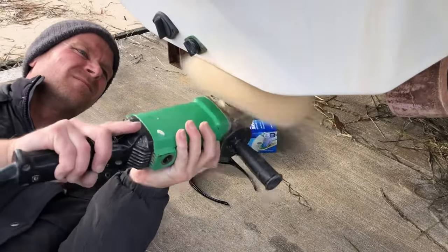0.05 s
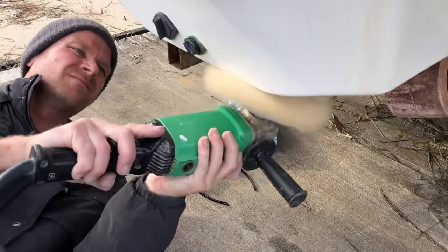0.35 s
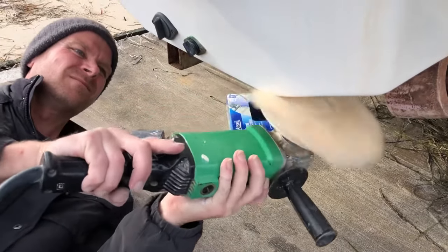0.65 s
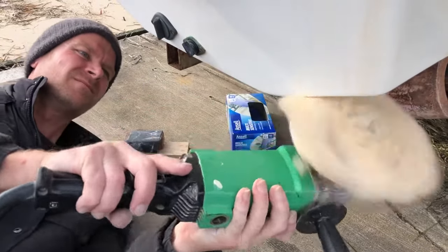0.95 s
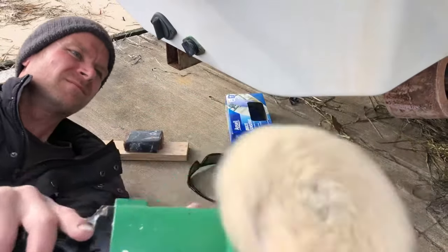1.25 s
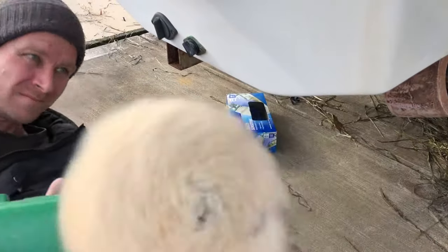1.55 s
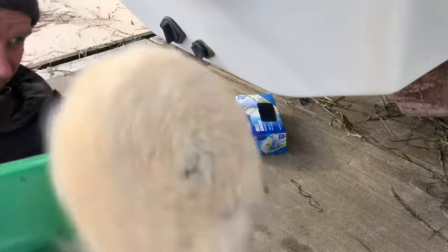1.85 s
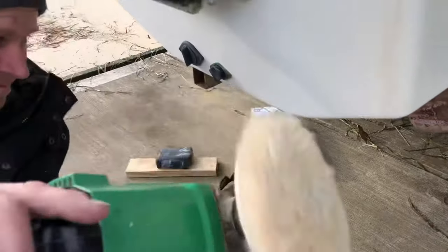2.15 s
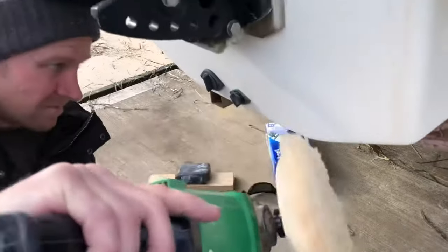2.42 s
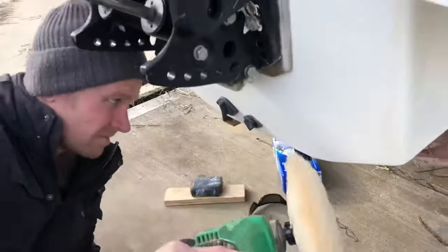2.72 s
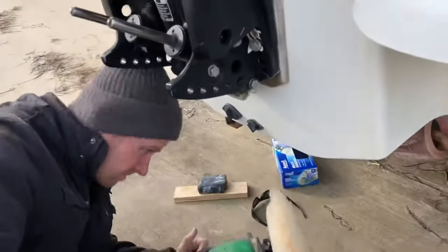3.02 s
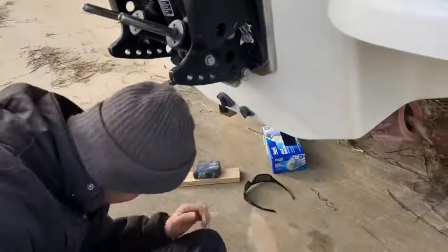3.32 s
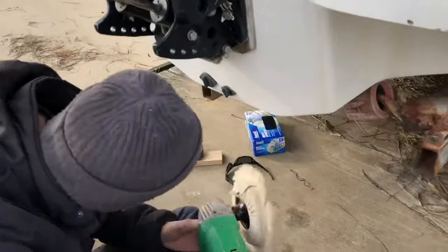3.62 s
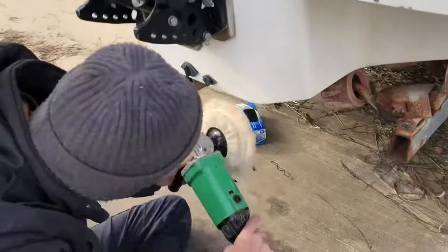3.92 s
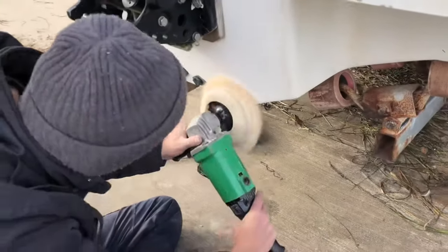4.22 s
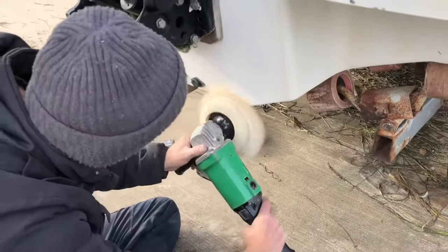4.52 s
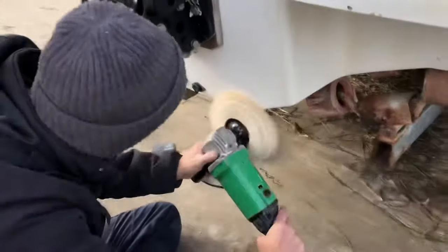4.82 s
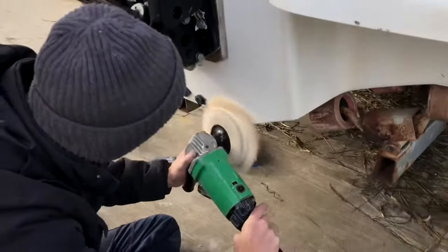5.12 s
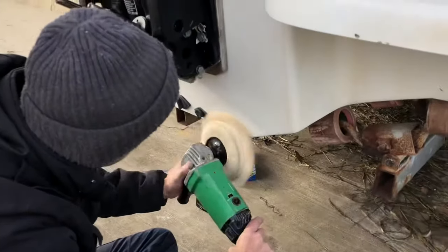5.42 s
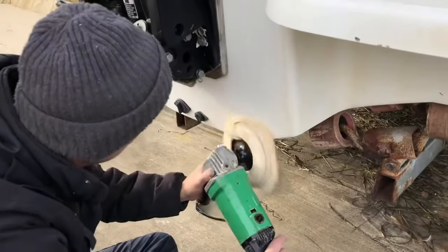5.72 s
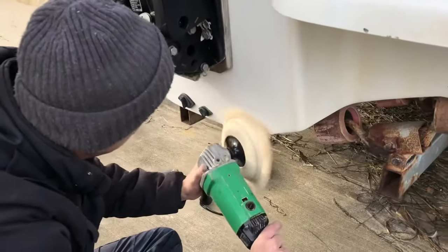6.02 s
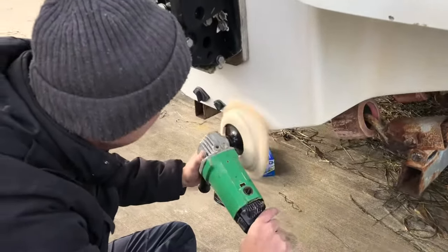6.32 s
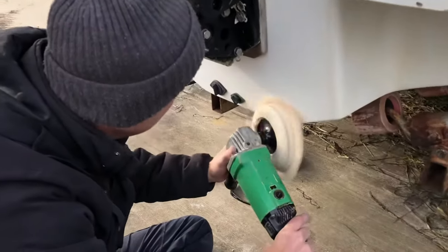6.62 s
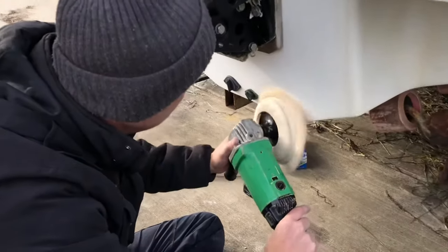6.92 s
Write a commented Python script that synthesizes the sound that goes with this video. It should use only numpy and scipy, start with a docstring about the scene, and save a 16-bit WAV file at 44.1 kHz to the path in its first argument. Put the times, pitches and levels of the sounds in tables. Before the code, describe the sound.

An electric polisher whines with a throb, coasts almost to a stop, then restarts and buffs a boat hull in short bursts.

```python
"""In an open boatyard, a rotary polisher with a wool pad is blipped, coasts almost to rest, restarts
with a mains buzz and buffs a hull in short bursts. One shaft speed sets the pitch of the fan, gear
and commutator whines and the throb of the pad. As it coasts, slack gears knock and carbon brushes
hiss. Gusts buffet the close microphone and a sleeve rustles."""
import sys
import numpy as np
from scipy import signal
from scipy.fft import rfft, irfft, next_fast_len
from scipy.io import wavfile
from scipy.ndimage import uniform_filter1d, map_coordinates

SR = 44100
rng = np.random.default_rng(int(sys.argv[2]) if len(sys.argv) > 2 else 0)


def wav_out(sig):
    """Save sig, one row per channel (or a flat mono array), as 16-bit PCM at SR to the path in sys.argv[1]."""
    wavfile.write(sys.argv[1], SR, np.round(np.clip(np.atleast_2d(sig).T, -1, 1) * 32767).astype(np.int16))


N = 306495
TIME = np.arange(N) / SR
STEP = 16  # samples per control step
MAINS_HZ, TOP_HZ = 50, 15800
REF_SPEED = 100  # reference for the level laws; all speeds are shaft turns per second
PAD_GEARING = 6.62  # shaft turns per pad turn
LIFT_S = 1.0  # the pad leaves the hull until the next squeeze

# trigger squeezes: press_s, release_s, top_turns_per_s, pad_drag_per_s, growl_db,
# lowest_blade_tone_db, blade_overtones_db
SQUEEZES = [(0, .245, 223, .843, -63, -1, -1), (3.872, 3.96, 102.5, .1, -49, -19, -13),
            (4.33, 4.5, 160, .25, -38.5, 0, -10), (4.89, 5.07, 184.7, .525, -39.5, -5, 1.5),
            (5.829, 5.971, 164, .68, -42.5, -7, -1), (6.42, 6.532, 162, .6, -40.5, -8.5, 0)]
# the pad catches on the hull: start_s, end_s, growl_db, lowest_blade_change_db, second_blade_change_db
CATCHES = [(4.14, 4.224, -45, 24.5, 6), (4.768, 4.891, -44, -9, 18)]
# modes of the metal gear head: pitch_hz, width_hz, gain_db
GEAR_HEAD_MODES = [(3650, 69, 7), (4370, 190, 4), (4905, 230, 3.5), (6170, 140, -5), (7640, 68, 10),
                   (1650, 87, 2)]


def amp(db):
    """Decibels to amplitude ratio."""
    return 10 ** (np.asarray(db) / 20)


def unit(x):
    """Normalisation to rms 1."""
    return x / np.sqrt(np.mean(x ** 2) + 1e-20)


def along(points, hz):
    """Interpolation of (frequency_hz, value) points on a logarithmic frequency axis."""
    frequencies, values = np.transpose(points)
    return np.interp(np.log(hz + 1), np.log(frequencies + 1), values)


def curve(points):
    """Linear interpolation of (time_s, value) points at every sample."""
    return np.interp(TIME, *np.transpose(points))


def drift(rate):
    """Smooth random modulation, rate knots a second, one value per control step."""
    return map_coordinates(rng.standard_normal(int(N * rate / SR) + 4), [TIME[::STEP] * rate])


def wobble(rate):
    """Smooth random modulation, one value per sample."""
    return np.interp(TIME, TIME[::STEP], drift(rate))


def fade(at_s, width_s):
    """A smooth step from 0 to 1."""
    return .5 + .5 * np.tanh((TIME - at_s) / width_s)


def swells(rows, edge_s):
    """Amplitude envelope of soft-edged (start_s, end_s, level_db) stretches."""
    return sum(amp(db) * fade(start, edge_s) * (1 - fade(end, edge_s)) for start, end, db in rows)


def filtered(x, response):
    """Linear filtering: the spectrum is multiplied by a frequency response."""
    size = next_fast_len(N + SR // 4)
    return irfft(rfft(x, size) * response(np.fft.rfftfreq(size, 1 / SR)), size)[:N]


def noise(spectrum):
    """White noise shaped to a relative spectral density, at rms 1."""
    return unit(filtered(rng.standard_normal(N), lambda hz: amp(along(spectrum, hz))))


def resonate(x, modes):
    """Resonance: each mode of a body adds a second-order band-pass to the direct sound."""
    def response(f):
        return 1 + sum(amp(db) * 1j * f * width / (pitch ** 2 - f ** 2 + 1j * f * width)
                       for pitch, width, db in modes)
    return filtered(x, response)


def patchy(x, depth_db):
    """Spectral modulation: the colour of a hiss wanders in patches as the tool is moved about."""
    spectra = signal.stft(x, nperseg=512)[2]
    patches = uniform_filter1d(rng.standard_normal(spectra.shape), size=4, axis=0)
    patches = uniform_filter1d(patches, size=36, axis=1)
    return unit(signal.istft(spectra * amp(depth_db * unit(patches)), nperseg=512)[1][:N])


def yard():
    """Ambient noise floor: still outdoor air and a faint far hum."""
    # outdoor background: frequency_hz, density_db
    air_spectrum = [(25, -16), (100, -3.5), (500, -8), (2000, -9), (6000, -21.5), (15000, -22.5)]
    hum = amp(-69.5) * np.sin(2 * np.pi * 174 * TIME + .26 * wobble(6.3))
    return hum + amp(-67.5) * noise(air_spectrum)


def sleeve():
    """Friction noise: rubbing cloth gives a flickering rustle."""
    # sleeve movements: start_s, end_s, level_db
    rustles = [(2.4, 2.67, -56.5), (3.04, 3.19, -56)]
    # rubbing cloth: frequency_hz, density_db
    cloth_spectrum = [(200, -9), (500, -9), (1000, -2), (1700, -7.5), (4000, -19.5)]
    return swells(rustles, edge_s=.01945) * amp(3.4 * wobble(60)) * noise(cloth_spectrum)


def wind(speed):
    """Turbulent pressure on the microphone: breeze and pad draught add in power, with puffs on top."""
    # strength of the breeze: time_s, relative_db
    gusts = [(0, -58), (3.2, -64.5), (4.05, -58), (4.7, -48.5), (5.65, -52), (6.1, -64), (6.95, -66)]
    # single puffs of air: start_s, end_s, level_db
    puffs = [(1.09, 1.13, -58), (2.335, 2.36, -54), (2.635, 2.66, -60), (3.53, 3.565, -58),
             (3.76, 3.82, -69), (4.295, 4.32, -49), (4.745, 4.77, -40.5), (5.145, 5.17, -46),
             (5.25, 5.36, -48), (5.495, 5.72, -49.5), (5.95, 5.985, -40.5), (6.315, 6.36, -42)]
    # buffeting: frequency_hz, density_db
    buffet_spectrum = [(20, -40.5), (35, -16.5), (55, 0), (110, 0), (220, -4.5), (400, -19), (1000, -28),
                       (4000, -87)]
    breeze = amp(curve(gusts) - 2.5 + 2.5 * wobble(28))
    draught = amp(-66.5) * (speed / REF_SPEED) ** 1.43
    return (np.hypot(breeze, draught) + swells(puffs, edge_s=.0039)) * noise(buffet_spectrum)


def run_down(top, since_s, pad_drag):
    """Speed of the unpowered shaft under constant friction and drag proportional to speed."""
    friction, drag = 21.7, .197 + pad_drag  # turns per s squared; share of speed lost per s
    return (top + friction / drag) * np.exp(-drag * (TIME - since_s)) - friction / drag


def shaft_speed():
    """Motor torque lifts the shaft to its top speed at each squeeze; friction and drag then slow it."""
    speed = np.full(N, 196.5)
    for press, release, top, pad_drag, *_ in SQUEEZES:
        low = np.interp(press, TIME, speed)
        rise = low + (top - low) * np.sin(np.pi / 2 * (TIME - press) / (release - press))
        coast = run_down(top, release, pad_drag)
        speed = np.select([TIME < press, TIME < release], [speed, rise], coast)
        if press < LIFT_S:
            freewheel = run_down(np.interp(LIFT_S, TIME, speed), LIFT_S, pad_drag=0)
            speed = np.where(TIME < LIFT_S, speed, freewheel)
    return np.maximum(speed, 1)


def grip():
    """Sample and hold: pad drag and blade-tone levels last from one squeeze to the next."""
    press, _, _, pad_drag, _, lowest_db, overtone_db = np.transpose(SQUEEZES)
    latest = np.searchsorted(press[1:], TIME)
    return [uniform_filter1d(column[latest], SR // 10) for column in (pad_drag, lowest_db, overtone_db)]


def strain(speed):
    """Angular acceleration of the motor, scaled from 0 to 1."""
    return np.clip(uniform_filter1d(np.gradient(speed) * SR, SR // 30) / 400, 0, 1)


def pad_turn(angle):
    """Rotating imbalance: the lopsided pad swings between -1 and 1 once per turn."""
    return np.sin(angle / PAD_GEARING + 1)


def brush_hiss():
    """Sliding friction of the carbon brushes, coloured by the resonances of their holders."""
    # sliding carbon: frequency_hz, density_db
    hiss_spectrum = [(1500, -26), (4000, -7), (7000, -3.5), (9000, -1.5), (11000, -3.5), (13000, -3.5),
                     (15800, -3.5)]
    # brush holders: pitch_hz, width_hz, gain_db
    holder_modes = [(6440, 240, -0.5), (7540, 400, 0.5), (9450, 505, -5.5), (11100, 660, -4),
                    (12900, 700, -6)]
    return patchy(resonate(noise(hiss_spectrum), holder_modes), depth_db=2)


def slow_brushes(speed, angle):
    """Uneven friction: at a crawl the brushes sizzle and squeak on one side of the commutator."""
    # sizzling contact: frequency_hz, density_db
    sizzle_spectrum = [(7000, -38), (11500, -4), (13000, 1), (14800, -2), (15800, -9.5)]
    # a brush sings as the shaft slows: start_s, end_s, level_db
    squeals = [(2.22, 2.45, -52), (2.45, 2.7, -59)]
    # singing brush: frequency_hz, density_db
    squeal_spectrum = [(10500, -38), (12200, -7), (12900, 0), (13500, -8), (14500, -35)]
    contact = amp(2.6 * (np.sin(angle) - 2.5) + 3 * wobble(40))
    squeak_hz = 14260 + 900 * np.cos(angle) + 300 * wobble(30) + 250 * wobble(900)
    falling_half = np.maximum(np.sin(angle), 0)  # the squeak sounds only while its pitch falls
    squeak = np.sin(2 * np.pi * np.cumsum(squeak_hz) / SR) * falling_half * amp(2) * 30 / (speed + 3)
    squeal = swells(squeals, edge_s=.04) * amp(3 * np.sin(angle)) * noise(squeal_spectrum)
    crawl = np.clip(speed / 45, 0, 1) ** 2.5 / (1 + (speed / 53) ** 14)
    return squeal + amp(-45.5) * crawl * contact * (noise(sizzle_spectrum) + squeak)


def shaft_harmonic(order, speed, angle, db, path):
    """One harmonic of the shaft rate; the higher it lies, the more its level and phase wander."""
    hz = order * speed[::STEP]
    swell_db = min(order / 100, 1) * 3.5 * drift(16)
    level = amp(db + along(path, hz) + swell_db) * (hz < TOP_HZ) * (1 - .8 * strain(speed)[::STEP])
    jitter_rad = np.interp(TIME, TIME[::STEP], hz / 8500 * drift(170))
    return np.repeat(level, STEP)[:N] * np.sin(order * angle + jitter_rad)


def commutator(speed, angle, bars=24, runout_rad=.01):
    """Bar-passing harmonics: a thin whine, amplitude-modulated by the turning shaft and pad."""
    # harmonics of the bar rate: level_db
    bar_harmonics = [-12, -2, 0, -1, -4]
    # transmission through the motor shell: frequency_hz, gain_db
    motor_shell = [(4000, -7), (6000, -9), (7000, -6), (7600, 3), (8100, -7), (9000, -9), (9700, 0),
                   (10400, -1), (11200, 2), (11900, -2), (12500, -6), (15800, -13)]
    swayed = angle + runout_rad * np.sin(angle)
    whine = sum(shaft_harmonic(k * bars, speed, swayed, db, motor_shell)
                for k, db in enumerate(bar_harmonics, 1))
    return whine * (1 + .7 * np.sin(angle)) * amp(2 * pad_turn(angle))


def gear_whine(speed, angle, loaded, teeth=12, runout_rad=.011, stall_speed=41):
    """Tooth-mesh harmonics; an eccentric pinion modulates them, adding sidebands at the shaft rate."""
    # mesh harmonics with slack teeth: level_db
    slack_harmonics = [4, 6.5, 6, 6, -1, 1, -5, -2, -4, -1, -5, 3, -4, 0]
    # mesh harmonics under load, the last holding for all above: level_db
    loaded_harmonics = [5, -1.5, 7, -6, -14]
    # transmission through the gear case: frequency_hz, gain_db
    gear_case = [(200, -30), (520, -6), (720, -7), (850, -5), (1150, -4), (1300, -12), (1620, -5),
                 (1730, -9), (1900, 3), (2120, 2), (2360, 9), (2550, 2), (2700, 4), (2850, 1), (3080, -8),
                 (3500, -2), (3740, 4), (4220, 2), (4700, -5), (5200, -1), (5800, -2), (6500, 3),
                 (7200, -5), (7800, -1), (8600, -4), (9900, 0), (11300, 0), (15500, -4)]
    swayed, load = angle + runout_rad * np.sin(angle), loaded[::STEP]
    whine = np.zeros(N)
    for k, slack_db in enumerate(slack_harmonics, 1):
        level_db = (1 - load) * slack_db + load * loaded_harmonics[:k][-1]
        whine += shaft_harmonic(k * teeth, speed, swayed, level_db, gear_case)
    return whine * (1 + .75 * np.sin(angle + 1)) / (1 + (stall_speed / speed) ** 7)


def gear_knocks(speed, attack_s=.0026, decay_s=.0046, rattle_per_s=13, stall_speed=21):
    """Backlash: teeth strike across their slack; light random knocks weaken as the shaft slows."""
    # hard tooth impacts: start_s, strength_db
    hard_knocks = [(0.936, -23.5), (0.992, -28), (1.027, -28.5), (1.042, -30), (1.128, -40), (1.19, -43),
                   (1.263, -34), (1.415, -35), (1.5, -37), (1.532, -34), (1.558, -24.5), (1.563, -35),
                   (1.599, -35.5), (1.643, -35), (1.794, -32), (1.836, -32), (1.86, -34), (1.898, -34),
                   (1.948, -35), (2.005, -41), (2.098, -36.5), (2.745, -47), (2.787, -47), (3.72, -53),
                   (3.771, -53), (4.026, -31)]
    # tooth impact: frequency_hz, density_db
    knock_spectrum = [(150, -44), (250, -14), (484, 3), (1210, -7.5), (2010, 2.5), (2920, -0.5),
                      (3660, -6.5), (3950, -12), (4870, -9.5), (9000, -27), (11700, -48), (19800, -120)]
    gap_scatter, scatter_db = .5 * rng.standard_normal((80, 2)).T
    times = LIFT_S + np.cumsum(np.exp(gap_scatter)) / rattle_per_s
    speeds = np.interp(times, TIME, speed)
    strengths_db = -36.5 + 11 * np.log10(speeds / REF_SPEED) + scatter_db
    coasting = (times < SQUEEZES[1][0]) & (speeds > stall_speed)
    level = np.zeros(N)
    for start, db in [*hard_knocks, *zip(times[coasting], strengths_db[coasting])]:
        span = slice(round(start * SR), round(start * SR) + SR // 10)
        age = np.maximum(TIME[span] - start, 0)
        level[span] += amp(db) * (1 - np.exp(-age / attack_s)) * np.exp(-age / decay_s)
    return level * unit(resonate(noise(knock_spectrum), GEAR_HEAD_MODES))


def start_buzz(start_s, end_s, decay_s):
    """Impulse train: the gears snap into mesh, then jolt every mains half cycle during run-up."""
    # jolting gears: frequency_hz, density_db
    jolt_spectrum = [(71, -60), (120, -38), (188, -14.5), (450, -18), (598, -4), (863, -16.5), (1300, -5.5),
                     (1410, -12), (1990, -3), (4480, -9.5), (5610, -8), (6080, -16.5), (7610, -17),
                     (15500, -30)]
    modes = [(544, 44, 7), (1580, 120, -2), (2610, 120, -14)]  # pitch_hz, width_hz, gain_db
    age = np.maximum(TIME - start_s, 0)
    jolts = np.exp(-(age % (.5 / MAINS_HZ)) / decay_s)
    snap = .7 * np.exp(-age / .003)
    level = (TIME > start_s) * (1 - fade(end_s, .019)) * (.49 + jolts + snap)
    return amp(-27.5) * level * unit(resonate(noise(jolt_spectrum), modes))


def gear_growl(throb):
    """Load modulation: torque ripples at twice the mains rate; a catching pad drags once a turn."""
    # loaded gears: frequency_hz, density_db
    growl_spectrum = [(350, -18.5), (560, -3), (1200, -18), (1750, 1), (2300, -6), (3500, -11), (8000, -29)]
    torque = 1 + .5 * np.sin(2 * np.pi * 2 * MAINS_HZ * TIME)
    pulls = [(press + .017, release - .01, db) for press, release, _, _, db, *_ in SQUEEZES]
    driven = swells(pulls, edge_s=.026) * torque
    caught = swells([catch[:3] for catch in CATCHES], edge_s=.017) * amp(4.9 * throb)
    return (driven + caught) * noise(growl_spectrum)


def fan(speed, angle, buffing, blades=7):
    """Blade-passing harmonics: they pulse with the pad, blur under acceleration and fade when slow."""
    # harmonics of the blade rate: level_db
    blade_harmonics = [-16, -10, -11.5, -21]
    # flutter of each harmonic with a pad turn: swing_db
    flutter = [2, 6, 3.5, 3]
    # path out of the vents: frequency_hz, gain_db
    vent_path = [(650, 8), (760, 1), (860, -9), (980, 4.5), (1250, 5), (1400, -1), (1800, -4), (2050, 0),
                 (2230, 5), (2620, -8), (2800, -6), (2980, 0), (3350, 0), (3600, 1), (3800, -7), (4400, -3),
                 (5200, -8)]
    # reflection off the hull: frequency_hz, gain_db
    hull_path = [(600, 12), (690, 17), (850, 6), (960, 0), (1260, 3.5), (1360, -8), (1480, -4), (1900, 1),
                 (2230, 4.5), (2550, -1), (2900, -2), (3300, -6), (3620, 4), (3800, 2), (4100, -2),
                 (5200, -3)]
    _, lowest_db, overtone_db = grip()
    blur = .2 + .3 * strain(speed) + .2 * (speed / 220) ** 8
    tones = np.zeros(N)
    for k, (db, flutter_db) in enumerate(zip(blade_harmonics, flutter), 1):
        hz = k * blades * speed
        path_db = (1 - buffing) * along(vent_path, hz) + buffing * along(hull_path, hz)
        grip_db = overtone_db if k > 1 else lowest_db - 9 * strain(speed)
        catch_db = sum(change_db[k - 1] * swells([(start, end, 0)], edge_s=.02)
                       for start, end, _, *change_db in CATCHES if k <= len(change_db))
        flicker_db = flutter_db * pad_turn(angle) + 1.6 * wobble(90) + 1.2 * wobble(8)
        level = amp(db + path_db + grip_db + catch_db + flicker_db)
        sway_rad = .15 * k * np.cos(angle / PAD_GEARING) + blur * k ** .7 * wobble(130)
        tones += level * np.sin(k * blades * angle + sway_rad)
    return 1.45 * tones * (1 + .45 * np.sin(angle)) / (1 + (100 / speed) ** 4)


def airflow(speed, angle, buffing, stall_speed=12.9):
    """Directivity: cooling air is heard from the vents, then the pad side, then against the hull."""
    # air at the vents: frequency_hz, density_db
    vent_spectrum = [(100, -37), (190, -11.5), (320, -14.5), (430, 1), (650, -1.5), (1000, -8.5),
                     (1600, -3.5), (2700, 0.5), (3600, -1), (4700, -8), (5200, -1), (5800, -15),
                     (6300, -9.5), (8000, -10.5), (15000, -17.5)]
    # air from the pad side: frequency_hz, density_db
    pad_spectrum = [(100, -11.5), (350, -10.5), (530, 4), (750, -6), (1250, -10), (2300, 0), (3000, -2.5),
                    (5000, -3), (6000, -10.5), (15000, -20.5)]
    # air with the tool against the hull: frequency_hz, density_db
    hull_spectrum = [(100, -26), (440, -11.5), (540, 3), (850, -6), (1350, -6.5), (1650, -0.5), (2400, 4.5),
                     (3200, -2), (4500, -5.5), (5100, -3.5), (5800, -11), (7700, -24), (15000, -36)]
    # cavity resonances of the housing: pitch_hz, width_hz, gain_db
    housing_modes = [(3096, 197, 14), (1614, 180, 7), (6140, 550, 10), (7630, 340, 6.5)]
    blade_tones = fan(speed, angle, buffing)
    vents = amp(-2.5) * patchy(noise(vent_spectrum), depth_db=2.5) + blade_tones
    blown = np.clip((speed / 215) ** 3, 0, 1)  # fast air sounds the housing like a whistle
    vents = (1 - .62 * blown) * vents + blown * amp(-5) * resonate(vents, housing_modes)
    pad = amp(-1.5) * patchy(noise(pad_spectrum), depth_db=2.5)
    hull = amp(-2.5) * unit(resonate(noise(hull_spectrum), GEAR_HEAD_MODES)) + blade_tones
    turned = fade(1.07, .039)
    air = (1 - turned) * vents + (turned - buffing) * pad + buffing * hull
    return air / (1 + (stall_speed / speed) ** 4)


def polisher(speed):
    """Superposition of the tool's sources; air, hiss and whines grow as powers of the shaft speed."""
    angle = 2 * np.pi * np.cumsum(speed) / SR
    first_pass = 1 - fade(LIFT_S + .01, .027)  # the vents face the microphone
    buffing = fade(3.885, .006)
    loaded = first_pass + buffing
    # nearness of the tool to the microphone: time_s, gain_db
    nearness = [(0, 0.5), (.9, 1), (1.8, 0), (2.35, 2), (3.1, 3), (4.05, -2), (4.3, -1), (4.5, 0.5),
                (6.95, 0.57)]
    near_db = curve(nearness)
    decades = np.log10(speed / REF_SPEED)
    # the throb grows with speed and is damped while the pad lies flat on the hull
    throb = (pad_turn(angle) + .87 * wobble(50)) * np.minimum(speed / 180, 1) * (1 - .3 * buffing)
    chatter = np.sin(angle) + .8 * wobble(260)
    rub_db = 10 * np.log10(1 + grip()[0] * loaded / .16)  # a pad drag of 0.16 per s doubles the power
    air_db = -44.34 + 21.5 * decades + rub_db + near_db + throb + chatter
    air = amp(air_db) * airflow(speed, angle, buffing)
    hiss_db = -47 + 20.5 * decades + near_db + .5 * throb + .54 * chatter
    hiss = amp(hiss_db) * brush_hiss() / (1 + (25 / speed) ** 4)  # dies below 25 turns per s
    mesh = amp(-58 + 16 * decades + 3 * first_pass + near_db) * gear_whine(speed, angle, loaded)
    bars = amp(-55 + 12 * decades + 4.5 * first_pass) * loaded * commutator(speed, angle)
    buzz = start_buzz(start_s=3.8724, end_s=3.962, decay_s=.0023)
    brushes = hiss + slow_brushes(speed, angle)
    return air + mesh + bars + buzz + brushes + gear_growl(throb) + gear_knocks(speed)


def scene():
    """Pressures add at one microphone: the close polisher, wind, sleeve and open yard."""
    speed = shaft_speed()
    return (polisher(speed) + wind(speed) + sleeve() + yard())[None]


def record(dry):
    """Band limiting: an ideal low-pass removes everything above TOP_HZ."""
    return np.array([filtered(x, lambda hz: hz < TOP_HZ) for x in dry])


dry = scene()
out = record(dry)
wav_out(out)
```